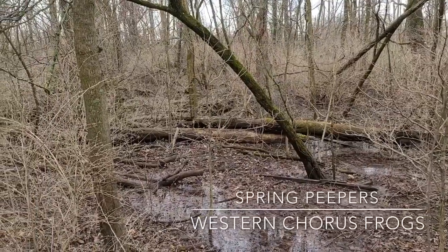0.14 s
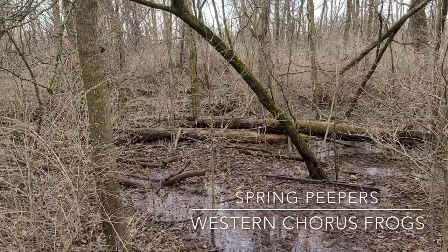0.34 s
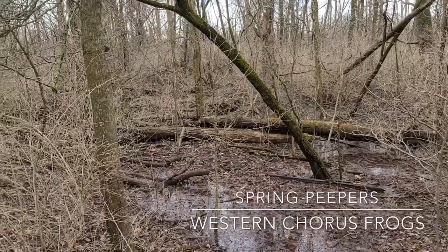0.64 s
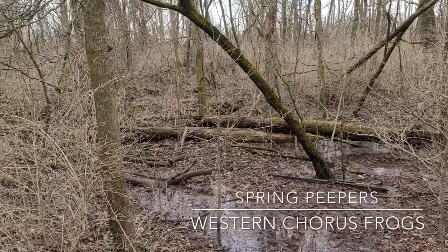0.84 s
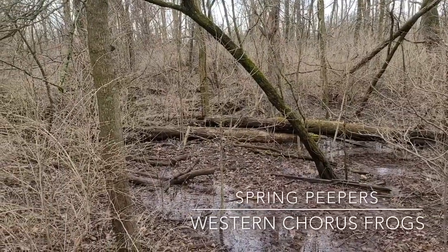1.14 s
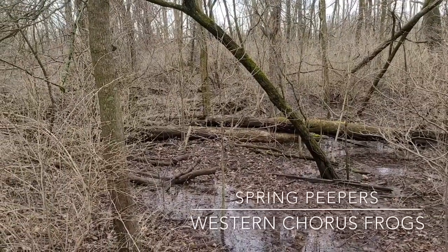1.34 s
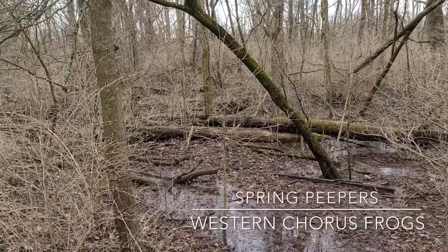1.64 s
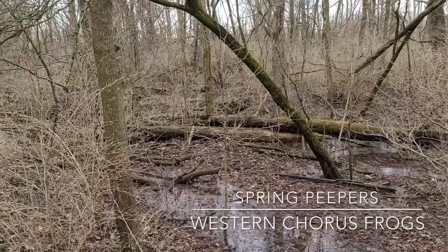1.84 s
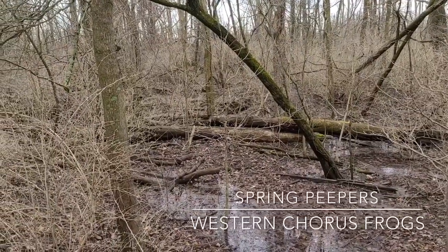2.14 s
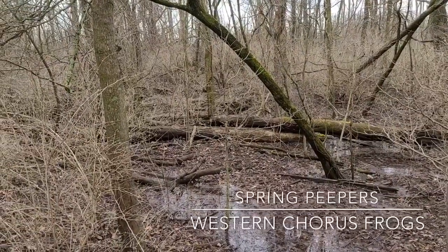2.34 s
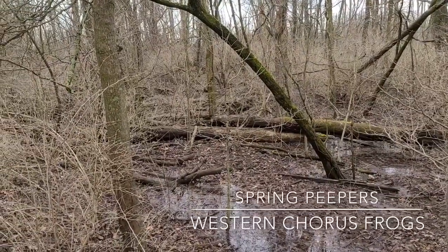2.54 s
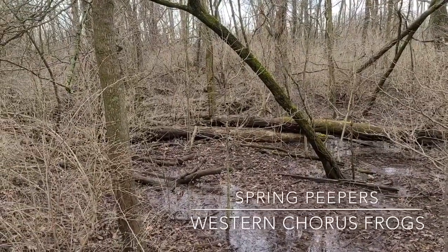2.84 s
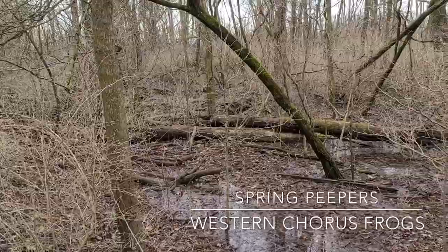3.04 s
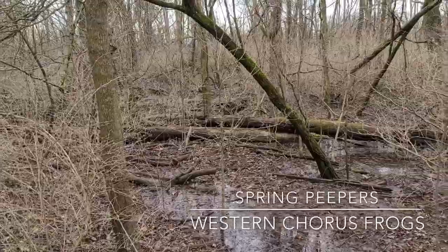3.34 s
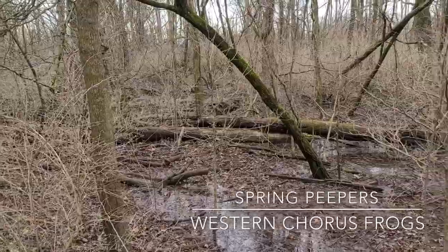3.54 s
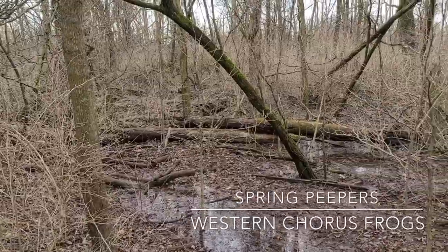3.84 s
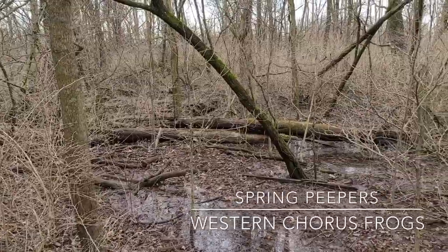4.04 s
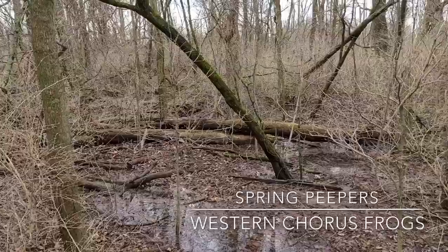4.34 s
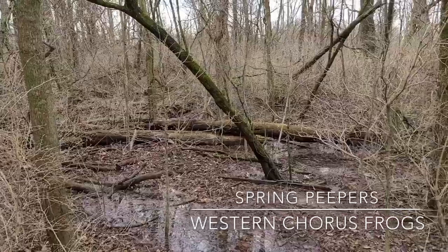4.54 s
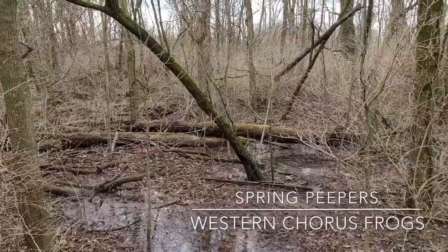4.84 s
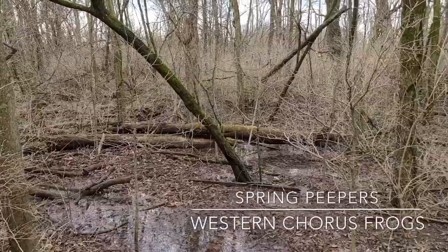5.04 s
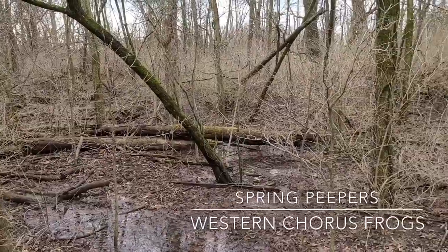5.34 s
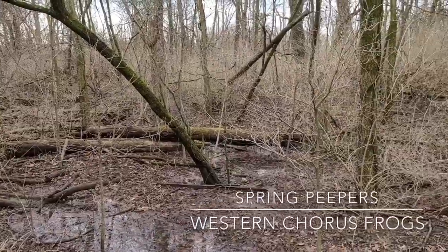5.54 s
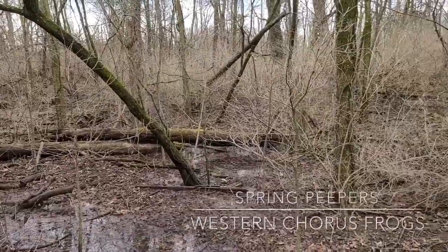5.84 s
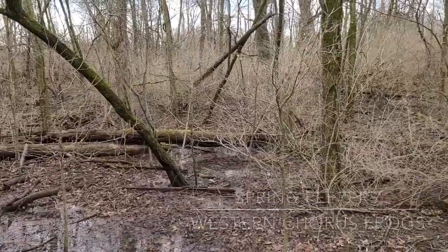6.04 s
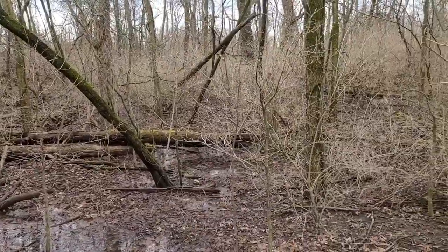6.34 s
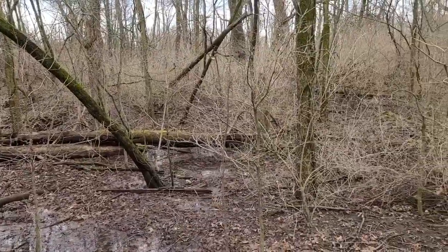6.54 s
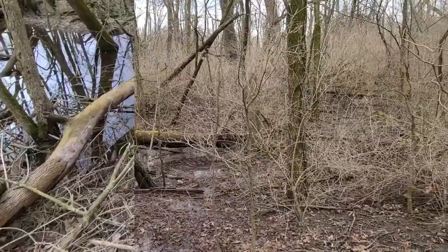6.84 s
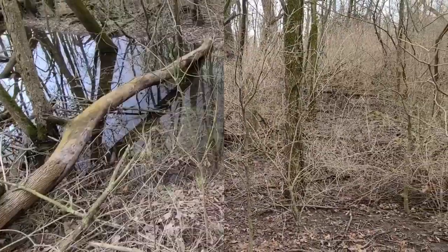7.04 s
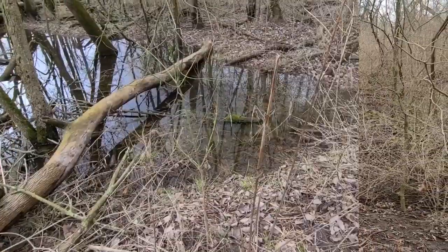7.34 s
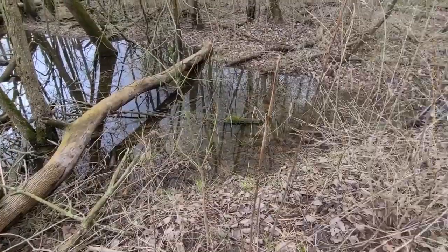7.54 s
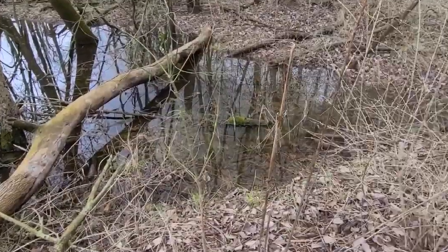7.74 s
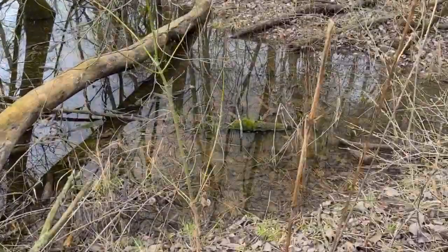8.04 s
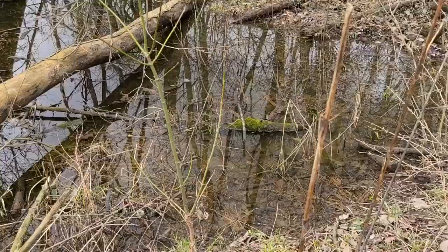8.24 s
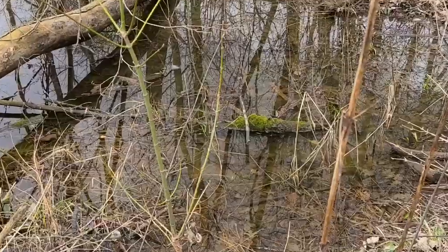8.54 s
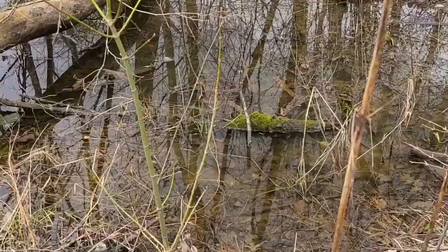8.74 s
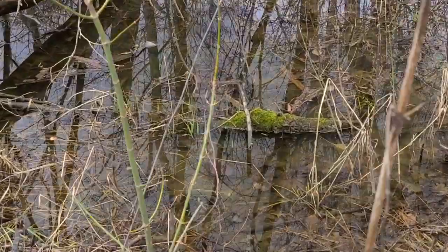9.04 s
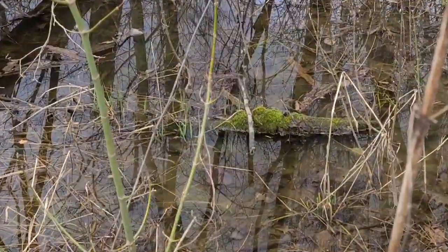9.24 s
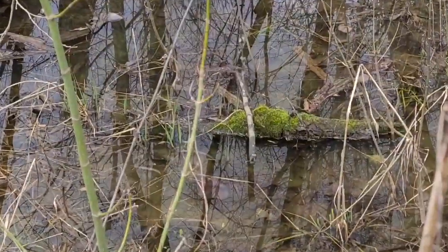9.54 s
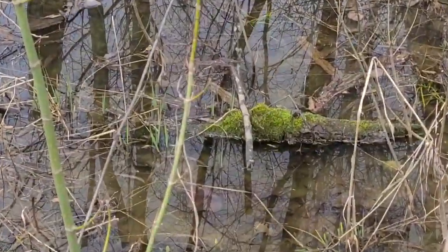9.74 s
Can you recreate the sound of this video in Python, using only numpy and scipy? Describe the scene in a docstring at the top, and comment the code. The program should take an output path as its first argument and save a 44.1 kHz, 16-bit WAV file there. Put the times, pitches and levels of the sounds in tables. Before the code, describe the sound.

A dense chorus of small frogs trills over distant traffic rumble, with twigs snapping and dry leaves rustling close by.

```python
"""Small frogs chorus at a flooded woodland pool: pulse trains ring their vocal sacs in overlapping,
rising trills, blurred by trunk echoes; a far crowd surges in waves. Close by, dry leaves rustle,
twigs snap and damp sticks knock. A few birds whistle over far traffic and a soft woodland wash.
Frogs and background drop in level near 7 s, then partly recover."""
import sys
import numpy as np
from scipy import signal
from scipy.fft import rfft, irfft, next_fast_len
from scipy.io import wavfile

SR = 44100
rng = np.random.default_rng(int(sys.argv[2]) if len(sys.argv) > 2 else 0)


def dump_mix(stems):
    """Bounce the given channels to the path in sys.argv[1] as a 16-bit WAV at rate SR."""
    frames = np.atleast_2d(stems).T  # one column per channel
    limited = np.clip(frames, -1, 1)  # hard clip at full scale
    pcm = np.round(limited * 32767).astype(np.int16)
    wavfile.write(sys.argv[1], SR, pcm)


N = 436130
SIDE_LAG_SAMPLES = round(0.37 * SR / 1000)  # snap or leaf tick to the farther microphone
LITTER_START_S = 1.9

# far frogs and background drop in level near 7 s, then partly recover: t/s, level change/dB
LEVEL_DROP = [(0, 0), (4.5, 0), (6.5, 2), (7.4, -8.5), (8.1, -8.5), (8.9, -5), (9.89, -2)]
# dry leaf spectrum: f/Hz, relative level/dB
LEAF_SPECTRUM = [(2500, 1), (4800, 3.5), (7000, -3), (9000, -2.5), (10500, -4), (12500, 1), (15000, -1.5)]


def trill(length_s, first_hz, last_hz, pulses_per_s, ring_s=0.0023, ease=0.7, scatter=0.022):
    """One frog: pulses ring the vocal sac; pitch climbs fast, then levels off."""
    out, t = np.zeros(round((length_s + 0.041) * SR)), np.arange(1500) / SR
    pulse = (t / ring_s) ** 2 * np.exp(-t / ring_s)
    start, *draws = rng.uniform(-1, 1, (41, 4))
    for k, (detune, force, phase, late) in enumerate(draws):
        progress = (k + start[0] % 1 + abs(late) / 2) / (pulses_per_s * length_s)
        if progress < 1:
            climb = progress + ease * progress * (1 - progress)
            hz = (first_hz + (last_hz - first_hz) * climb) * (1 + scatter * detune)
            effort = np.sin(np.pi * progress ** 0.75) ** 0.58 * gain(1.6 * force)  # peaks before midway
            add(out, progress * length_s, effort * pulse * np.sin(2 * np.pi * (hz * t + phase)))
    return unit_rms(out)


def near_frogs(pulses_per_s=28.5, tempo_spread=0.13):
    """Frogs around the pool join each trill, each slightly off in time, pitch and tempo."""
    # calls: t/s, length/s, first f/Hz, last f/Hz, base level/dB
    trills = [(-.16, .75, 2670, 3094, -55), (.52, 0.56, 2900, 3320, -53), (0.581, .47, 2760, 3080, -62),
              (0.702, 0.33, 3320, 3450, -62), (0.983, .3, 2560, 2700, -70), (1.22, 0.72, 2750, 3060, -55),
              (1.9, .42, 2976, 3290, -56.5), (1.85, 0.56, 2760, 2980, -64), (2.12, 0.56, 2953, 3233, -57.5),
              (2.481, .27, 2590, 2710, -66), (2.63, 0.69, 2750, 3058, -56.5),
              (3.301, 0.65, 3010, 3344, -61), (3.28, 0.64, 2824, 3050, -63),
              (3.55, 0.66, 2990, 3210, -56.5), (3.952, 0.28, 2560, 2710, -68),
              (4.147, 0.36, 3120, 3370, -59.5), (4.14, 0.6, 2733, 3010, -55.5),
              (4.72, 0.49, 2885, 3300, -56.5), (5.121, 0.58, 2916, 3210, -57.5),
              (5.22, .3, 2620, 2790, -65), (5.45, 0.52, 2760, 3010, -57.5), (5.99, 0.47, 2746, 3140, -57),
              (6.192, .38, 3054, 3330, -53.5), (6.559, 0.75, 2670, 3005, -61),
              (6.48, 0.71, 2990, 3230, -63.5), (7.62, 0.54, 2900, 3220, -70), (8.1, 0.43, 2910, 3130, -65),
              (8.419, .42, 3120, 3320, -64), (8.9, 0.53, 2990, 3185, -65), (9.05, 0.31, 2520, 2660, -71.5),
              (9.349, 0.39, 2700, 2990, -62.5), (9.699, 0.42, 3030, 3380, -59)]
    # frogs: level offset/dB, pitch spread/ratio, left lag/ms, echo/dB
    neighbours = [(-3, .012, .39, 3.5), (-5, .035, -.41, 2.5), (-6.5, 0.036, .48, 5), (-7, .05, .36, 9),
                  (-5.5, 0.062, -.48, 7), (-7.5, .025, -.37, 7.5), (-7, 0.059, .42, 3)]
    out = np.zeros((2, N))
    for frog_db, spread, lag_ms, echo_db in neighbours:
        voice = np.zeros(N)
        for at_s, length_s, first_hz, last_hz, db in trills:
            late, detune, tempo = rng.uniform(-1, 1, 3)
            pitch = 1 + spread * detune
            rate_hz = pulses_per_s * (1 + tempo_spread * tempo)
            call = trill(length_s, first_hz * pitch, last_hz * pitch, rate_hz)
            add(voice, at_s + 0.025 * late, gain(db + frog_db) * call)
        out += trees(voice, t60_s=0.68, echo_db=echo_db, lag_ms=lag_ms)
    return out * pan(2.1)


def far_frogs(pulses_per_s=700, wave_s=1.39, first_crest_s=0.886, spread_db=6.5, ring_s=0.0053):
    """Distant trill pulses merge into a shimmering band, louder and higher on each crest."""
    surge = np.cos(2 * np.pi * (np.arange(N) / SR - first_crest_s) / wave_s)
    level_db = -55.5 + surge + curve(LEVEL_DROP)
    centre_hz = 3063 + 90 * surge
    onsets, t = np.flatnonzero(rng.random(N) < pulses_per_s / SR), np.arange(700) / SR
    body, detune, force = rng.uniform(-1.05, 1, (len(onsets), 3)).T
    hz = centre_hz[onsets] + 200 * body + 150 * detune
    pulse = signal.windows.hann(len(t)) * np.exp(-t / ring_s)
    rings = gain(spread_db * force)[:, None] * pulse * np.sin(2 * np.pi * hz[:, None] * t)
    crowd = trees(overlap_add(onsets, rings), t60_s=0.31, echo_db=1.5, lag_ms=0.48)
    return unit_rms(crowd) * gain(level_db) * pan(2.0)


def leaves(split_hz=9000, rub_gain=0.8):
    """Dry leaves rub and crackle in clumps; a light brush is mostly fizz, a firm press has body."""
    # stirs underfoot: t/s, length/s, body gain/dB, fizz gain/dB, L-R/dB
    stirs = [(3.33, 0.075, -69, -63, 6), (3.47, 0.69, -68.5, -69, 1), (4.377, 0.11, -68, -60, 5),
             (6.435, 0.12, -78, -67, 10), (7.121, .047, -69, -69, -2), (7.267, 0.19, -86, -65, -8),
             (8.023, 0.25, -84, -64, -13), (8.398, 0.36, -80, -66.5, -15), (9.074, 0.28, -71.5, -65, -13),
             (9.458, 0.15, -55.5, -52, -7), (9.789, 0.096, -59.5, -64, -7)]
    restless = np.ones((2, 1)) * gain(-73.5 + 1.5 * drift(13)) * (np.arange(N) / SR > LITTER_START_S)
    pressing, brushing = restless.copy(), restless.copy()
    for at_s, length_s, body_db, fizz_db, pan_db in stirs:
        stir = pan(pan_db) * signal.windows.tukey(round(length_s * SR), 0.8)
        add(pressing, at_s, gain(body_db) * stir)
        add(brushing, at_s, gain(fizz_db) * stir)
    rustle = rub_gain * noise(LEAF_SPECTRUM) + crackle()
    rustle = unit_rms(rustle * gain(1.1 * drift(90)))
    body = signal.sosfiltfilt(signal.butter(2, split_hz, fs=SR, output="sos"), rustle)
    return body * pressing + (rustle - body) * brushing


def crackle(ticks_per_s=1800, pitches=24, spread_db=3.7, ring_s=0.00022):
    """Leaf edges catch; each tick rings for a few cycles, to the left or right."""
    out, t = np.zeros((2, N)), np.arange(128) / SR
    for k, hz in enumerate(np.linspace(4500, 15500, pitches)):
        onsets = np.flatnonzero(rng.random(N) < ticks_per_s / pitches / SR)
        force = np.minimum(rng.exponential(1, len(onsets)), 3.5)
        sizes = gain(at_freq(LEAF_SPECTRUM, hz) + spread_db * force)
        tick = np.sin(2 * np.pi * hz * t) * np.exp(-t / ring_s)
        ticks = overlap_add(onsets, sizes[:, None] * tick)
        out[k % 2] += ticks
        out[1 - k % 2] += np.roll(ticks, SIDE_LAG_SAMPLES) / 2
    return unit_rms(out)


def snaps(tilt_from_hz=5400, ring_width_hz=700, splinter_db=-19):
    """Twigs crack, the thinner the brighter, then splinter in the litter; one thumps the ground."""
    # twigs: t/s, level/dB, tilt/(dB/octave), L-R/dB, ring f/Hz, ring boost/dB, rise/s
    twigs = [(1.846, -55, 16, 4, 5300, 0, .0008), (2.192, -51, 14, 4, 5300, 0, .0008),
             (3.038, -43.5, 4, 9, 5300, 9, 0.0013), (3.194, -32, 11, 9, 5300, 0, 0.0016),
             (3.289, -47.5, -4, 10, 4700, 17, 0.0015), (3.359, -46, 5, 9, 5300, 0, 0.0011),
             (3.447, -32, 3.5, 8, 5600, 11, 0.0011), (3.505, -45, 6, 7, 5300, 0, 0.0007),
             (3.7384, -37, 16, 13, 5300, 0, .0011), (4.0487, -47, -11, 6, 5600, 10, 0.0038),
             (4.061, -50, -10, 7, 4300, 14, 0.0035), (4.4048, -27, 12, 13.5, 4700, 6, 0.002),
             (4.462, -52, 12, 6, 5300, 0, .0008), (6.4665, -51, 9, 9, 5300, 0, 0.0013),
             (6.997, -46.5, 8, -7, 5300, 5, 0.002), (7.1275, -59, -4, -6, 5300, 12, 0.0047),
             (7.141, -49, 4, -7, 5300, 3, .0024), (7.28, -48, -7, 0, 3900, 16, 0.0018),
             (7.295, -42.5, 3.5, -14, 4600, 2, 0.0027), (7.368, -54, 9, -6, 5300, 0, .0008),
             (7.591, -50, 8, -10, 7200, 5, 0.0022), (8.049, -46, 10, -11, 5300, 0, .0008),
             (8.4037, -28.5, -0.5, -1, 4900, 2, 0.00094), (8.577, -49, 1, -9, 5300, 0, .001),
             (8.7957, -48, 9, -8, 5300, 0, .0009), (9.257, -41, 11, -11, 5300, 0, 0.00087),
             (9.514, -43, -5, 10, 5400, 9, 0.0015), (9.61, -47, 3, -1, 5300, 2, 0.002),
             (9.642, -52, -8, -1, 6700, 14, 0.0012), (9.6486, -43, -14, -7, 5250, 18, 0.0015),
             (9.7634, -50, -6, -13, 5800, 7, .001), (9.802, -47, 4, -8, 5300, 3, .0008),
             (9.8165, -50, 3, -6, 5300, 4, .0009), (9.831, -52, -2, -6, 5600, 9, .0009),
             (9.8395, -52, 0, -6, 5600, 7, .0009)]
    # crack spectrum: f/Hz, relative level/dB
    crack_spectrum = [(800, -26), (2300, -1.5), (4000, -2.5), (7500, -2.5), (10000, 0.5), (13500, -0.5),
                      (16000, 7)]
    # ground thump: t/s, level/dB, push/s
    thumps = [(8.405, -42, 0.011)]
    out, t = np.zeros((2, N)), np.arange(4096) / SR
    hz = np.fft.rfftfreq(len(t), 1 / SR)
    octaves = np.log2(np.maximum(hz / tilt_from_hz, 1))
    for at_s, db, tilt, pan_db, ring_hz, ring_db, rise_s in twigs + stem_ticks():
        resonance = np.exp(-((hz - ring_hz) / ring_width_hz) ** 2)
        colour = gain(at_freq(crack_spectrum, hz) + tilt * octaves + ring_db * resonance)
        fibres, *splinters = unit_rms(irfft(rfft(rng.standard_normal((3, len(t)))) * colour))
        crack = fibres * (t / rise_s) ** 2 * np.exp(2 - 2 * t / rise_s)
        late = np.roll(crack, SIDE_LAG_SAMPLES)
        pair = np.array([crack, late] if pan_db > 0 else [late, crack])
        litter = gain(splinter_db) * np.exp(-t / (7 * rise_s)) * np.array(splinters)
        add(out, at_s, gain(db) * pan(pan_db) * (pair + litter))
    for at_s, db, push_s in thumps:
        attack = np.minimum(t / 0.00052, 1)
        add(out, at_s, gain(db) * (1 - t / push_s) * np.exp(-t / push_s) * attack)
    return out


def stem_ticks(count=30, db=-58, tilt_db_per_octave=3, ring_db=6, rise_s=0.0005):
    """Tiny stems snap at random in the disturbed litter; returns twig rows."""
    rows = []
    for at_s in rng.uniform(LITTER_START_S, N / SR, count):
        force, side, pitch = rng.uniform(-1, 1, 3)
        ring_hz = np.interp(pitch, (-1, 1), (4500, 8000))
        rows.append((at_s, db + 3 * force, tilt_db_per_octave, 9 * side, ring_hz, ring_db, rise_s))
    return rows


def knocks(slip_s=0.0025):
    """A damp stick gives way: quick slips ring one dull resonance."""
    # sticks: t/s, f/Hz, dry peak/dB, decay/s
    sticks = [(7.592, 2100, -43, 0.00032), (8.4042, 2450, -45, .0003), (8.6485, 2050, -41, 0.0017)]
    out, t = np.zeros(N), np.arange(1500) / SR
    for at_s, hz, db, ring_s in sticks:
        slips = rng.standard_normal(len(t)) * np.exp(-t / slip_s)
        knock = signal.fftconvolve(slips, np.sin(2 * np.pi * hz * t) * np.exp(-t / ring_s))
        add(out, at_s, gain(db) * knock / abs(knock).max())
    return trees(out, t60_s=0.15, echo_db=-10, lag_ms=0.03)


def birds():
    """Thin gliding whistles echo among the trunks; fast pitch waver makes some buzz."""
    # notes: t/s, length/s, first f/Hz, last f/Hz, level/dB, waver depth/ratio, echo/dB
    notes = [(1.33, 0.14, 9100, 8700, -76, .035, 4), (1.48, 0.082, 6030, 8300, -68, 0.079, 3),
             (2.69, .11, 2480, 2310, -65, .035, 5), (3.355, 0.021, 2370, 2120, -55, .035, -7),
             (5.296, 0.024, 6250, 7100, -64, .025, -2), (5.314, .04, 7400, 8100, -73, 0.028, 0),
             (5.398, .19, 8800, 8750, -77, .035, 3), (5.767, 0.074, 1730, 1810, -60, .008, 1),
             (5.784, 0.19, 1980, 2060, -63.5, .008, -1), (5.773, 0.16, 4030, 4180, -67, .032, 4),
             (6.211, 0.11, 1650, 1580, -58.5, 0.015, 1), (7.107, 0.079, 2100, 2170, -69, .02, -1),
             (7.183, .045, 1990, 1850, -62, .035, -11), (7.193, 0.044, 1592, 1450, -64, 0.048, -4),
             (7.304, 0.062, 7100, 7380, -68, .026, 0), (8.094, 0.065, 6900, 7140, -75, .045, 2),
             (8.63, 0.027, 2185, 2210, -57, .03, -7), (8.89, .03, 6800, 7200, -71, .04, 3)]
    out, waver = np.zeros((2, N)), drift(170)
    for at_s, length_s, first_hz, last_hz, db, depth, echo_db in notes:
        size = round(length_s * SR)
        buzz = 1 + depth * np.roll(waver, round(at_s * SR))[:size]
        hz = np.linspace(first_hz, last_hz, size) * buzz
        note = gain(db) * unit_rms(np.sin(2 * np.pi * np.cumsum(hz) / SR) * signal.windows.tukey(size, 0.7))
        add(out, at_s, trees(np.pad(note, (0, SR)), t60_s=0.53, echo_db=echo_db, lag_ms=0.02))
    return out


def traffic(roar_db=-45):
    """Far roads: low rumble, tyre roar and a few wavering engine drones."""
    # rumble and tyre spectra: f/Hz, relative level/dB
    rumble_spectrum = [(11, -43), (20, -24), (38, -2.5), (70, 3), (88, 1), (194, -19.5), (220, -19.5),
                       (290, -34.5), (480, -120)]
    roar_spectrum = [(76, -9), (130, -1), (194, -9), (301, -9.5), (333, -12.5), (629, -16), (863, -24.5),
                     (1010, -23), (1260, -29), (1500, -36), (1950, -66), (3300, -120)]
    # rumble loudness: t/s, level/dB
    rumble_level = [(0, -37), (1.7, -38), (2.3, -41), (3.2, -36.5), (4.2, -37), (4.7, -39.5), (6.5, -39.5),
                    (7.4, -46), (8.2, -44.5), (8.9, -40.5), (9.89, -42)]
    # engines: t/s, length/s, f/Hz, level/dB
    engines = [(-.5, 2.5, 80.8, -35), (-.3, 4, 47.13, -43), (3.548, 0.89, 46.36, -36),
               (5.752, 0.9, 76.26, -40)]
    drones = np.zeros(N)
    for at_s, length_s, hz, db in engines:
        size = round(length_s * SR)
        cycles = np.cumsum(hz * (1 + 0.0015 * drift(0.71)[:size])) / SR
        envelope = gain(db + 0.44 * drift(1.0)[:size]) * signal.windows.tukey(size, 0.3)
        add(drones, at_s, envelope * np.sin(2 * np.pi * cycles))
    rumble = noise(rumble_spectrum) * gain(curve(rumble_level))
    roar = noise(roar_spectrum) * gain(roar_db + curve(LEVEL_DROP))
    return rumble + roar + drones


def woods(wash_db=-54, air_db=-76.5, calls_db=-61.5, calls_start_s=7.04, calls_length_s=3.73):
    """Soft wash from the trees under thin hiss; very distant calls swell once in the quieter stretch."""
    # wash, airy hiss, finest hiss and far call spectra: f/Hz, relative level/dB
    wash_spectrum = [(700, 1.5), (1250, -2), (1620, 1), (1950, -3), (2400, -9), (2750, -2), (3200, -2.5),
                     (3800, -22.5)]
    air_spectrum = [(2000, -19), (3700, 11), (4900, 14), (6300, -10), (8000, -9), (10000, -13),
                    (15800, -29)]
    fizz_spectrum = [(3000, -30), (7000, 2.5), (10000, -25), (12000, 7), (14000, 4), (15800, 7.5)]
    calls_spectrum = [(1300, -11), (1700, 0.5), (1880, 1), (2050, -2), (2400, -37)]
    # finest hiss: t/s, level/dB
    fizz_level = [(0, -69), (1.3, -69), (2.3, -65.5), (9.89, -67.5)]
    change_db, swell = curve(LEVEL_DROP), np.zeros(N)
    add(swell, calls_start_s, gain(calls_db) * signal.windows.hann(round(calls_length_s * SR)))
    wash = noise(wash_spectrum) * gain(wash_db + 0.5 * change_db)
    air = noise(air_spectrum) * gain(air_db + 0.37 * change_db)
    fizz = noise(fizz_spectrum) * gain(curve(fizz_level))
    return wash + air + fizz + noise(calls_spectrum) * swell


def trees(x, t60_s, echo_db, lag_ms, echoes_per_s=1500):
    """Direct sound reaches the left microphone late; trunks scatter a dying tail of echoes."""
    t = np.arange(SR) / SR
    taps = rng.standard_normal((2, SR)) * (rng.random((2, SR)) < echoes_per_s / SR)
    taps *= gain(-60 * t / t60_s)
    taps /= np.linalg.norm(taps, axis=1, keepdims=True)
    tail = signal.oaconvolve(x[None], taps, axes=1)[:, :len(x)]
    direct = np.array([np.roll(x, round(lag_ms * SR / 1000)), x])
    return (direct + gain(echo_db) * tail) / np.hypot(1, gain(echo_db))


def noise(spectrum):
    """Coloured noise from all around, rms 1; alike at both microphones only in the bass."""
    # left-right likeness: f/Hz, coherence/ratio
    coherence = [(30, 1), (70, 0.96), (130, 0.99), (290, 0.77), (640, 0.4), (1400, 0.35), (3100, 0.036),
                 (7000, 0.028), (15000, 0.035)]
    # right microphone's lead: f/Hz, lead/ms
    lead = [(500, 0.05), (1100, .43), (4000, 0.482), (8000, 0.057), (11000, .01)]
    # balance: f/Hz, L-R/dB
    balance = [(60, -0.1), (700, -0.6), (1300, 0), (2400, -1), (4400, -0.5), (8000, 1.5), (15000, 3.5)]
    size = next_fast_len(N, True)
    hz = np.fft.rfftfreq(size, 1 / SR)
    left, other = rfft(rng.standard_normal((2, size)))
    shared = np.clip(at_freq(coherence, hz), -1, 1)
    advance = np.exp(2j * np.pi * hz * at_freq(lead, hz) / 1000)
    right = advance * (shared * left + np.sqrt(1 - shared ** 2) * other)
    colour = gain(at_freq(spectrum, hz) + at_freq(balance, hz) * np.array([[0.5], [-0.5]]))
    return unit_rms(irfft(np.array([left, right]) * colour, size)[:, :N])


def drift(rate_hz):
    """Smooth random wander, rms 1."""
    hz = np.fft.rfftfreq(N, 1 / SR)
    return unit_rms(irfft(rfft(rng.standard_normal(N)) * np.exp(-(hz / rate_hz) ** 2), N))


def gain(db):
    """Decibels to amplitude."""
    return 10 ** (np.asarray(db) / 20)


def pan(db):
    """Stereo gains for a left-minus-right level."""
    return gain([[db / 2], [-db / 2]])


def unit_rms(x):
    """Scale to rms 1."""
    return x / np.sqrt(np.mean(x ** 2) + 1e-20)


def at_freq(points, hz):
    """Interpolate a table over log frequency."""
    points_hz, values = np.transpose(points)
    return np.interp(np.log(hz + 1), np.log(points_hz + 1), values)


def curve(points):
    """Interpolate a time table at every sample."""
    return np.interp(np.arange(N) / SR, *np.transpose(points))


def add(mix, at_s, sound):
    """Mix a sound in; at_s may be negative."""
    at = round(at_s * SR)
    sound = sound[..., max(-at, 0):]
    part = mix[..., max(at, 0):][..., :sound.shape[-1]]
    part += sound[..., :part.shape[-1]]


def overlap_add(onsets, grains):
    """Sum one grain per onset sample."""
    samples = onsets[:, None] + np.arange(grains.shape[1])
    return np.bincount(samples.ravel(), grains.ravel(), N)[:N]


def scene():
    """The pool and the wood around it."""
    return near_frogs() + far_frogs() + traffic() + woods() + leaves() + snaps() + knocks() + birds()


def record(dry):
    """Recorder band limit."""
    cutoff_hz = 15930
    lowpass = signal.firwin(511, cutoff_hz, window=("kaiser", 9), fs=SR)
    return signal.oaconvolve(dry, lowpass[None], "same")


dry = scene()
out = record(dry)
dump_mix(out)
```